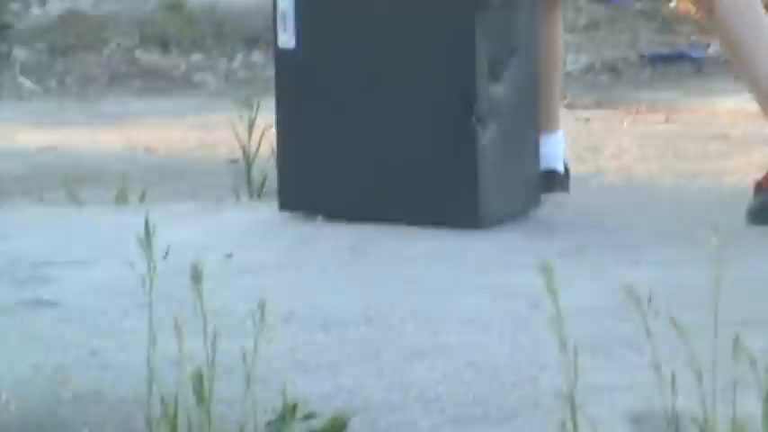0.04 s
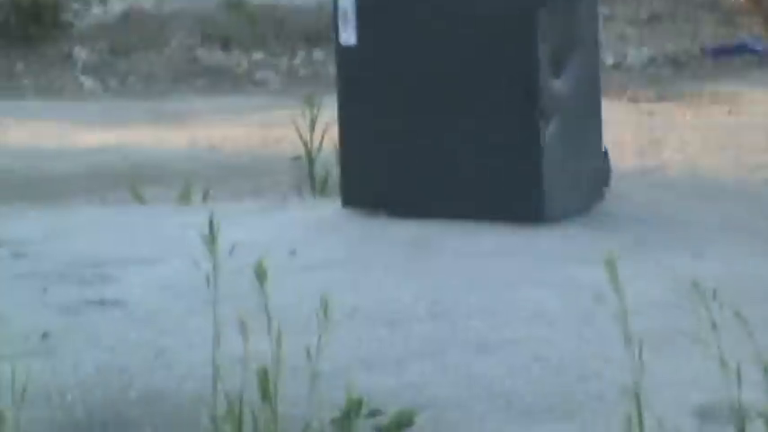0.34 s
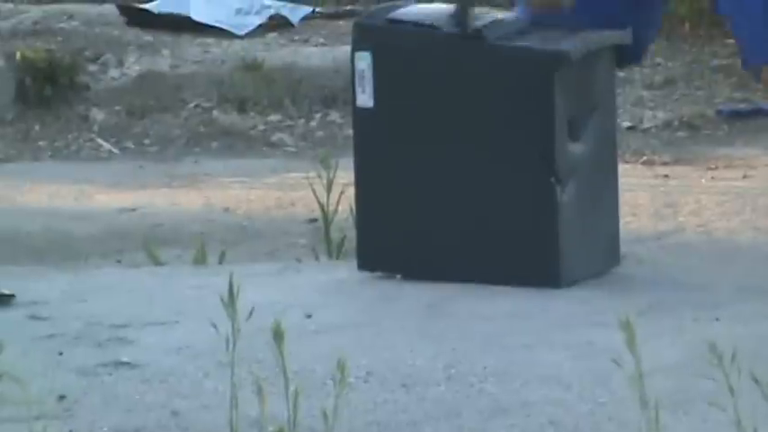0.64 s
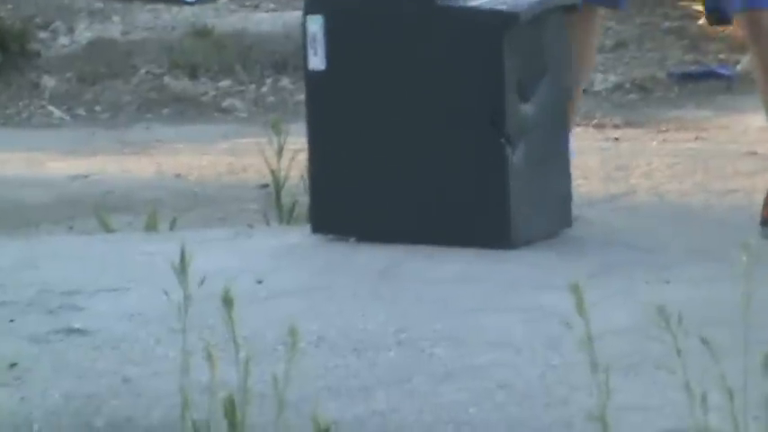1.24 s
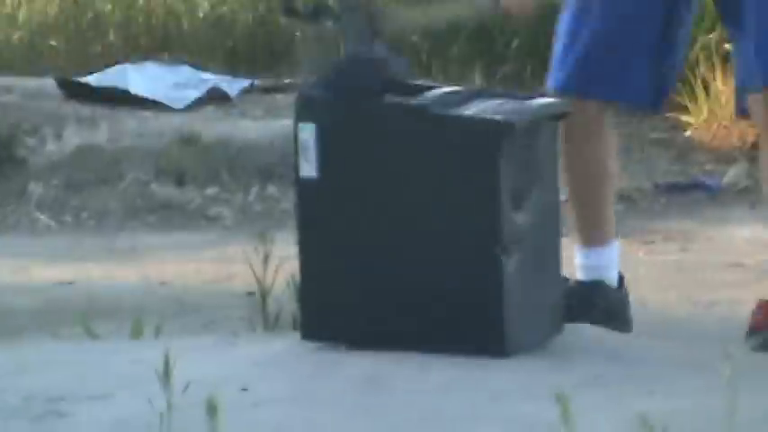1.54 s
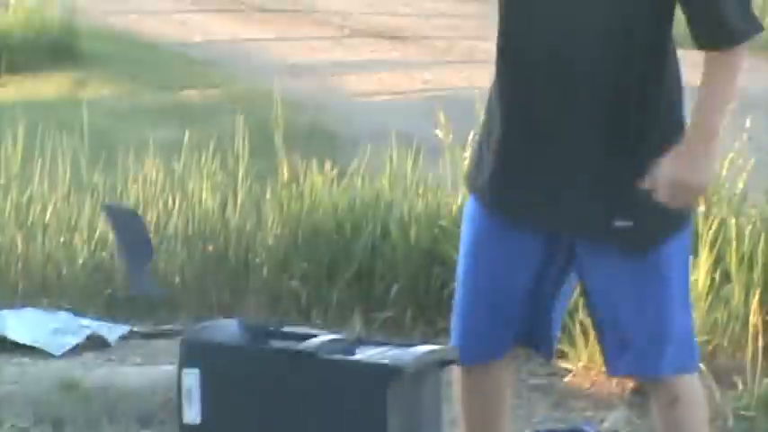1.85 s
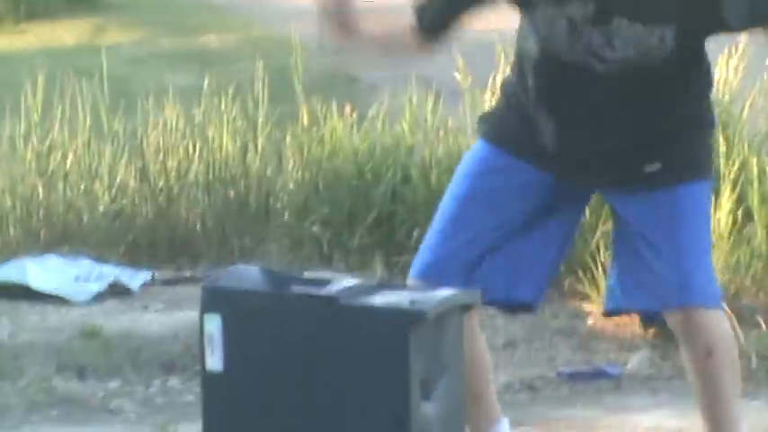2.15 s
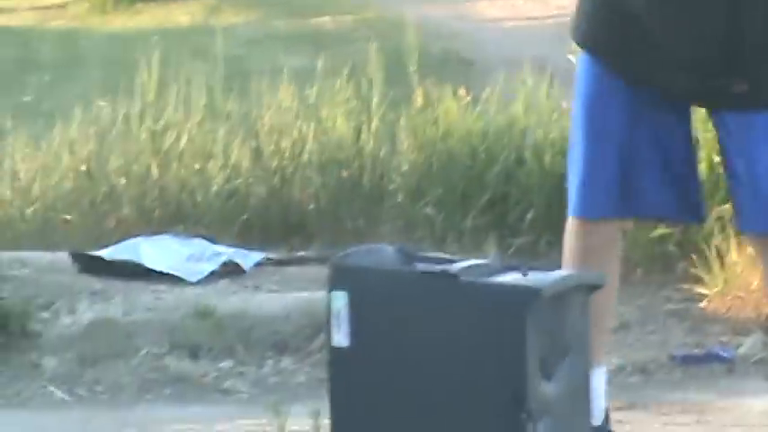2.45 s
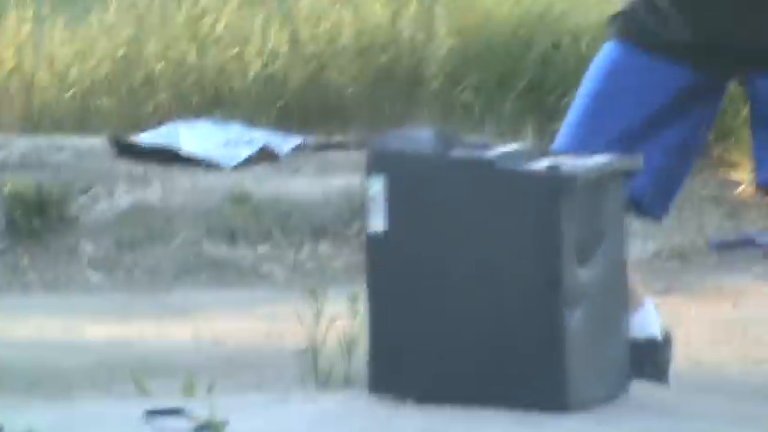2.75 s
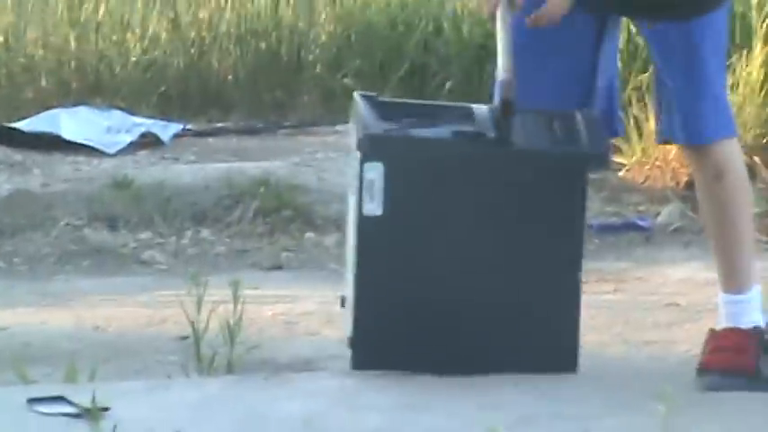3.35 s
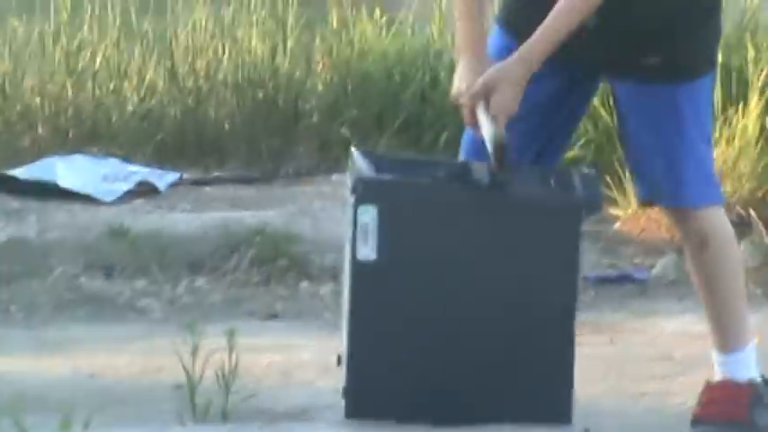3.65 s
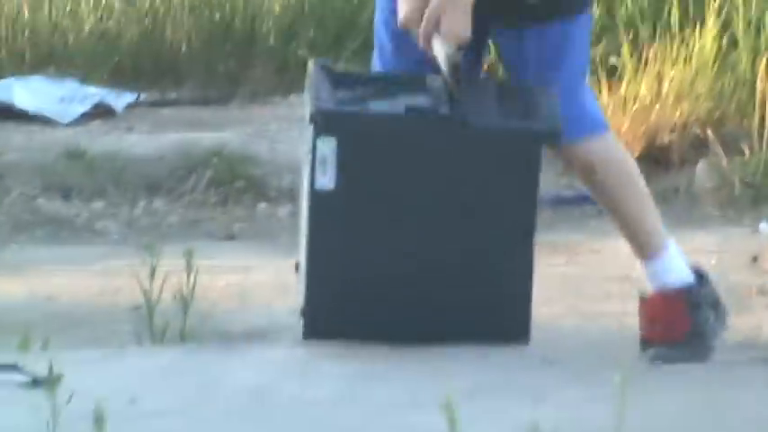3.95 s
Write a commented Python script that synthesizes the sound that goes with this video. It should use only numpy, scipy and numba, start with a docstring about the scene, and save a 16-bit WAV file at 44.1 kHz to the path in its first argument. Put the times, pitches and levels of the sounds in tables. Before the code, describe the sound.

Four hammer blows bang and rattle a metal computer case a few metres away in a quiet yard. A broken-off cover bounces on concrete midway, and after the last hit the case knocks back down onto the ground.

```python
"""A hammer strikes a steel computer case four times on a concrete slab outdoors. Each blow cracks, thumps
and rings the panels; loose parts rattle and knock, the case rocks and lands, and a broken-off cover
bounces on the slab. Contacts are bursts of tiny clicks that excite the modes of the part they hit.
Dull footfalls, faint birds, hiss and mains hum lie behind; a fast limiter ducks the loudest peaks."""
import sys
import numpy as np
from scipy import signal
from scipy.fft import rfft, irfft, next_fast_len
from scipy.io import wavfile
from numba import njit

SR = 44100
rng = np.random.default_rng(int(sys.argv[2]) if len(sys.argv) > 2 else 0)


def log_audio(samples):
    """Write samples as a 16-bit WAV file to the path given in sys.argv[1]."""
    # one column per channel
    frames = np.atleast_2d(samples).T
    # limit to full scale, then quantise
    limited = np.clip(frames, -1, 1)
    pcm = np.round(limited * 32767).astype(np.int16)
    wavfile.write(sys.argv[1], SR, pcm)


N = 176400
STRIKE_RISE_S = 0.0012


def undb(db):
    """Decibels to gain."""
    return 10 ** (np.asarray(db) / 20)


def unit(x):
    """Scale to unit energy."""
    return x / np.sqrt(np.sum(x ** 2))


def colour(x, points):
    """Minimum-phase filter through (frequency [Hz], gain [dB]) points."""
    size = 2 * next_fast_len(x.shape[-1] // 2 + 2048)
    hz, db = np.array(points, float).T
    gain_db = np.interp(np.log(np.fft.rfftfreq(size, 1 / SR) + 1), np.log(hz), db)
    cepstrum = irfft(np.log(undb(gain_db)))
    cepstrum[1:size // 2] *= 2
    cepstrum[size // 2 + 1:] = 0
    return irfft(rfft(x, size) * np.exp(rfft(cepstrum)))[..., :x.shape[-1]]


def through(x, response):
    """Convolve, keeping the input length."""
    return signal.fftconvolve(x, response)[:len(x)]


def add(out, start_s, x):
    """Mix x in at start_s."""
    i = int(start_s * SR)
    out[i:i + len(x)] += x[:len(out) - i]


def wander(t, rate_hz):
    """Random values joined by straight lines."""
    points = rng.standard_normal(len(t) // 10)
    return np.interp(t * rate_hz, np.arange(len(points)), points)


def ring(hz, t60_s):
    """One damped resonance."""
    t = np.arange(SR // 2) / SR
    return np.sin(2 * np.pi * hz * t) * np.exp(-np.log(1000) * t / t60_s)


def fading_noise(t60_s):
    """Many close resonances dying together; unit energy."""
    t = np.arange(SR // 2) / SR
    return unit(rng.standard_normal(len(t)) * np.exp(-np.log(1000) * t / t60_s))


def chatter(rise_s, decay_s, grain_db=2, clatter_db=1.5, clatter_hz=230):
    """A burst of tiny uneven contacts that swells and dies away."""
    t = np.arange(SR // 2) / SR
    signs = rng.choice([-1, 1], len(t))
    clicks = signs * undb(grain_db * rng.standard_normal(len(t)) + clatter_db * wander(t, clatter_hz))
    envelope = np.minimum(t / rise_s, 1) * np.exp(-np.maximum(t - rise_s, 0) / decay_s)
    return unit(clicks * envelope) * np.linalg.norm(envelope)


def struck_part(modes, spectrum, modes_db, modes_t60_s, wash_db, wash_t60_s):
    """Impulse response: a click, a wash of dense modes, and clear modes that shift as the part flexes."""
    wash = undb(wash_db) * fading_noise(wash_t60_s)
    wash[0] += 1  # the click
    clear = 0
    for hz, db in modes:
        gain = undb(db) * rng.choice([-1, 1]) * rng.random()
        shifted_hz = hz * (1 + 0.015 * rng.standard_normal())
        clear += gain * ring(shifted_hz, modes_t60_s)
    return unit(unit(colour(wash, spectrum)) + undb(modes_db) * unit(clear))


BASS_HZ, MID_HZ, TREBLE_HZ = 328, 1180, 7000
CASE_DULLING, COVER_DULLING = 0.72, 0.85  # treble dB lost per bass dB
def contact(db, bass_db, rise_s, decay_s, dulling, response):
    """One contact rings a part at a new spot; the heavier it is, the duller."""
    tone = [(BASS_HZ, bass_db), (MID_HZ / 2, bass_db / 2), (MID_HZ, 0), (MID_HZ * 2, 0),
            (TREBLE_HZ, -dulling * bass_db)]
    force = colour(chatter(rise_s, decay_s), tone)
    return undb(db) * through(force, response())


# hiss spectrum (frequency [Hz], gain [dB])
HISS_COLOUR = [(20, -26), (110, 13), (440, -1.5), (650, 3.5), (3300, -0.5), (5000, -13.5), (16000, -24)]
# mains partials (frequency [Hz], level [dB])
HUM_PARTIALS = [(49.9, -48.5), (99.9, -54.5)]
def background(hiss_db=-49, side_gain_db=-11):
    """Soft outdoor hiss and mains hum, as mid and side."""
    t = np.arange(N) / SR
    hiss = colour(rng.standard_normal((2, N)), HISS_COLOUR)
    hiss *= undb(hiss_db) / hiss.std()
    hum = sum(np.sqrt(2) * undb(db) * np.sin(2 * np.pi * (hz * t + rng.random()))
              for hz, db in HUM_PARTIALS)
    return hiss[0] + hum, undb(side_gain_db) * hiss[1]


# chirps (time [s], length [s], start pitch [Hz], end pitch [Hz], level [dB])
BIRD_CHIRPS = [(0.066, 0.07, 3500, 2710, -44), (.43, 0.047, 4200, 5200, -60),
               (1.33, 0.074, 4900, 5120, -46)]
def birds(waver_depth_hz=160, waver_rate_hz=770):
    """Distant gliding chirps with a fast pitch waver."""
    out = np.zeros(N)
    for start_s, length_s, first_hz, last_hz, db in BIRD_CHIRPS:
        progress = np.linspace(0, 1, int(length_s * SR))
        glide_hz = first_hz + (last_hz - first_hz) * progress
        hz = glide_hz + waver_depth_hz * wander(progress * length_s, waver_rate_hz)
        add(out, start_s, undb(db) * np.sin(np.pi * progress) * np.sin(2 * np.pi * np.cumsum(hz) / SR))
    return out


# footfalls (time [s], relative level [dB])
FOOTFALLS = [(1.3254, -34), (1.436, -33), (2.649, -42.5), (3.67, -46)]
# thud spectrum (frequency [Hz], gain [dB])
FOOTFALL_COLOUR = [(150, -32), (370, 20), (620, 7.5), (1200, 15), (5000, -19)]
def steps():
    """Shoes thud on the slab."""
    out = np.zeros(N)
    for start_s, db in FOOTFALLS:
        add(out, start_s, undb(db) * chatter(STRIKE_RISE_S, decay_s=0.017))
    return colour(out, FOOTFALL_COLOUR)


def hard_burst(hz, rise_s, decay_s, skirt_db=-31.5):
    """Tiny hard contacts around one pitch."""
    return colour(chatter(rise_s, decay_s), [(hz / 8, skirt_db), (hz, 0), (hz * 4, skirt_db)])


# sharp ticks and knocks (time [s], relative level [dB], centre [Hz])
SHARP_KNOCKS = [(.033, -44.5, 4340), (.097, -38, 4000), (0.9306, -10, 3080), (1.014, -33, 9700),
                (1.258, -48, 8500), (1.876, -35.5, 6000), (2.314, -12.5, 3320), (2.356, -25.5, 7300),
                (2.467, -19.5, 7800), (2.492, -24, 2820), (2.633, -41, 5940), (2.774, -31, 8500),
                (2.7742, -30.5, 2860), (3.148, -17.5, 3050), (3.814, -32, 3130)]
# grit scrapes (time [s], relative level [dB])
GRIT_SCRAPES = [(.090, -59.5), (.155, -56), (1.820, -48.5)]
def knocks_and_scrapes(gain_db=12, ring_db=-4.5):
    """Sharp ticks and knocks from the case, cover and small fragments; grit scrapes on the slab."""
    out = np.zeros(N)
    for start_s, db, hz in SHARP_KNOCKS:
        add(out, start_s, undb(db) * hard_burst(hz, STRIKE_RISE_S, decay_s=0.002))
    for start_s, db in GRIT_SCRAPES:
        add(out, start_s, undb(db) * hard_burst(hz=7600, rise_s=0.013, decay_s=0.013))
    ringing = undb(ring_db) * through(out, fading_noise(t60_s=0.04))
    return undb(gain_db) * (out + ringing)


# cover modes (frequency [Hz], relative level [dB])
COVER_RESONANCES = [(820, 3), (1100, 6), (1595, 5), (1750, 9), (2300, 4.5)]
# cover click and wash spectrum (frequency [Hz], gain [dB])
COVER_SPECTRUM = [(200, -15), (750, 0.5), (1500, 3.5), (3000, 6.5), (5100, -8), (8000, -10), (16000, -28.5)]
def cover_response():
    """Ring of the loose cover."""
    return struck_part(COVER_RESONANCES, COVER_SPECTRUM,
                       modes_db=-2, modes_t60_s=0.08, wash_db=-2.5, wash_t60_s=0.062)


# bounces (time [s], level [dB], bass [dB], decay [s], ping [Hz])
COVER_BOUNCES = [(1.9035, -9, -4.5, 0.0037, 4310), (1.935, -20, 0, 0.0057, 2030),
                 (2.118, -21.5, -1, 0.0089, 3200), (2.159, -25.5, -8, 0.0063, 5900),
                 (2.185, -18.5, 3.5, 0.0071, 1276), (2.218, -9, -7.5, 0.0008, 3128),
                 (2.242, -25.5, -11, .005, 1599)]
def cover(ping_db=-4.5, ping_t60_cycles=185):
    """The broken-off cover clatters from edge to edge; each edge brings out another mode as a ping."""
    out = np.zeros(N)
    for start_s, db, bass_db, decay_s, hz in COVER_BOUNCES:
        clack = contact(db, bass_db, STRIKE_RISE_S, decay_s, COVER_DULLING, cover_response)
        ping = undb(ping_db) * np.linalg.norm(clack) * unit(ring(hz, ping_t60_cycles / hz))
        add(out, start_s, clack + ping)
    low_cut = signal.butter(4, 400, "high", fs=SR, output="sos")  # too small to radiate bass
    return signal.sosfilt(low_cut, out)


# steel panel modes (frequency [Hz], relative level [dB])
PANEL_RESONANCES = [(258, -1.5), (345, -7.5), (595, -2), (688, -5), (799, -5.5), (880, -8.5), (1283, -1),
                    (1614, -15)]
# panel click and wash spectrum (frequency [Hz], gain [dB])
PANEL_SPECTRUM = [(80, -19.5), (170, -6.5), (270, 4), (450, -4.5), (750, 1), (1050, -5), (1700, -4),
                  (2800, -3.5), (4500, -9), (8000, -11), (16000, -28)]
def panel_response():
    """Ring of the steel case."""
    return struck_part(PANEL_RESONANCES, PANEL_SPECTRUM,
                       modes_db=-11, modes_t60_s=0.17, wash_db=-3.5, wash_t60_s=0.098)


def rattles(contacts):
    """A series of contacts shakes the steel panels."""
    out = np.zeros(N)
    for start_s, db, bass_db, rise_s, decay_s in contacts:
        add(out, start_s, contact(db, bass_db, rise_s, decay_s, CASE_DULLING, panel_response))
    return out


# jolts (time [s], level [dB], bass [dB], rise [s], decay [s])
CASE_JOLTS = [(.730, -26.5, 1, 0.0029, 0.038), (.775, -27.5, -1.5, 0.0042, 0.12),
              (.804, -29, 12.5, 0.0018, 0.046), (.855, -35.5, 16.5, 0.003, 0.07),
              (.931, -37.5, 8.5, .002, 0.061), (1.31, -42.5, 3.5, 0.0029, 0.63),
              (1.565, -3.5, -2, 0.0061, 0.02), (1.605, -15.5, 0, 0.017, 0.019),
              (1.67, -39.5, 8, 0.0098, 0.074), (1.764, -25.5, 0, 0.0099, 0.0047),
              (1.803, -38, 6.5, 0.002, 0.16), (2.295, -18, -1, 0.0069, 0.053),
              (2.372, -28, 4.5, 0.0039, 0.11), (2.915, -13.5, -1.5, 0.0056, 0.03),
              (2.945, -19.5, 1, 0.013, 0.04), (3.04, -35.5, 4.5, 0.0029, 0.11)]
# landings (time [s], relative level [dB], bass [dB], rise [s], decay [s])
CASE_LANDINGS = [(3.099, -25, -2.5, 0.019, 0.037), (3.147, -28.5, -4.5, 0.0017, 0.054),
                 (3.222, -23.5, -0.5, 0.0024, 0.036), (3.35, -42, 0.5, 0.03, 0.045)]
# landing spectrum (frequency [Hz], gain [dB])
LANDING_COLOUR = [(60, 11), (170, 8.5), (800, 10), (1300, 4.5), (2600, 3.5), (14000, 2)]
def rocking_case():
    """The case jolts and rocks, shaking its loose parts, then drops back on the concrete."""
    return rattles(CASE_JOLTS) + colour(rattles(CASE_LANDINGS), LANDING_COLOUR)


# hammer contacts, last two in one blow (time [s], level [dB], thump [dB], decay [s], crack [Hz])
HAMMER_BLOWS = [(0.7183, -11, -9, 0.006, 3400), (1.5531, 4.5, -12, 0.0099, 2740),
                (2.279, -8, -17, 0.0046, 2730), (2.9006, -3, -23, 0.0003, 2600),
                (2.903, -9.5, -20, 0.005, 2550)]
def hammer(bass_db=-9, crack_db=8, crack_width_ratio=1.17):
    """Each blow makes a hard crack at the struck spot and a low thump as the panel gives."""
    out = np.zeros(N)
    for start_s, db, thump_db, decay_s, hz in HAMMER_BLOWS:
        hit = contact(db, bass_db, STRIKE_RISE_S, decay_s, CASE_DULLING, panel_response)
        crack_peak = [(hz / crack_width_ratio, 0), (hz, crack_db), (hz * crack_width_ratio, 0)]
        add(out, start_s, colour(hit, crack_peak))
        add(out, start_s + STRIKE_RISE_S, undb(thump_db) * ring(BASS_HZ, t60_s=0.031))
    return out


# left port against right (frequency [Hz], phase [rad])
MIC_PHASE = [(40, 0.49), (150, -0.7), (350, -1.23), (1100, -1.2), (7000, -0.35)]
def mic_ports(mid, side):
    """Two close microphone ports; above the low bass, the right one leads slightly."""
    hz, rad = np.array(MIC_PHASE).T
    phase_rad = np.interp(np.log(np.fft.rfftfreq(N, 1 / SR) + 1), np.log(hz), rad)
    sign = np.array([[1], [-1]])
    return irfft(rfft(mid) * np.exp(sign * 1j * phase_rad / 2), N) + sign * side


def scene(echo_db=-16, scatter_db=-13):
    """Case and debris a few metres away; the ground scatters the treble and the yard echoes faintly."""
    direct = hammer() + rocking_case() + cover() + knocks_and_scrapes() + steps() + birds()
    echo = through(direct, fading_noise(t60_s=0.86))
    yard = undb(echo_db) * colour(echo, [(2500, -4.0), (9000, -14.5)])
    treble = colour(direct, [(700, -14), (1800, 0)])
    scatter = undb(scatter_db) * through(treble, fading_noise(t60_s=0.047))
    background_mid, background_side = background()
    return mic_ports(direct + yard + background_mid, scatter + background_side)


@njit
def follow_peak(x, attack_s, release_s):
    """One-pole peak follower."""
    attack = 1 - np.exp(-1 / (attack_s * SR))
    release = 1 - np.exp(-1 / (release_s * SR))
    out, level = np.empty(len(x)), 0.
    for i in range(len(x)):
        level += (x[i] - level) * (attack if x[i] > level else release)
        out[i] = level
    return out


# microphone response (frequency [Hz], gain [dB])
MIC_RESPONSE = [(8500, 2), (10000, -4.5), (11800, 1.5), (15500, -5)]
def record(dry, limit_db=-10.5, ceiling=0.55, top_hz=16000):
    """Microphone colour, a fast limiter that ducks at the blows, soft saturation and a top cut."""
    x = colour(dry, MIC_RESPONSE)
    peak = follow_peak(np.abs(x).max(axis=0), attack_s=0.00017, release_s=0.023)
    limited = x * np.minimum(1, undb(limit_db) / (peak + 1e-9))
    saturated = ceiling * np.tanh(limited / ceiling)
    return signal.sosfilt(signal.ellip(8, .2, 70, top_hz, fs=SR, output="sos"), saturated)


dry = scene()
out = record(dry)
log_audio(out)
```